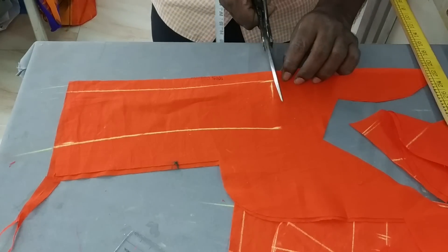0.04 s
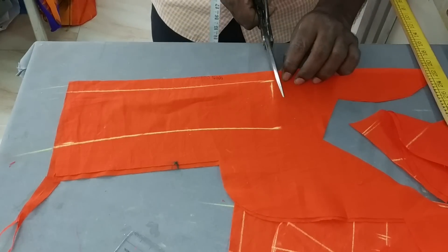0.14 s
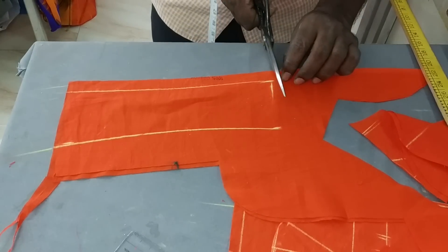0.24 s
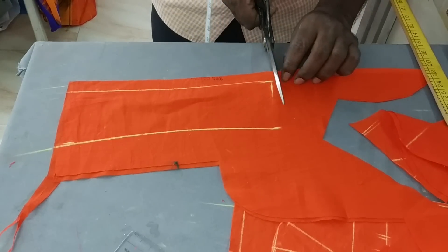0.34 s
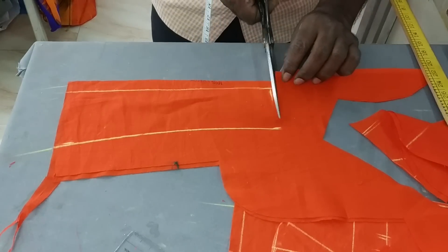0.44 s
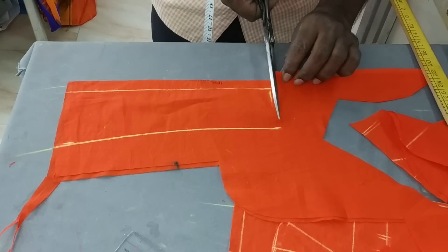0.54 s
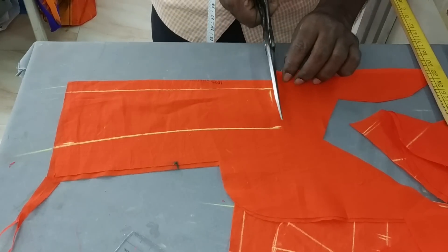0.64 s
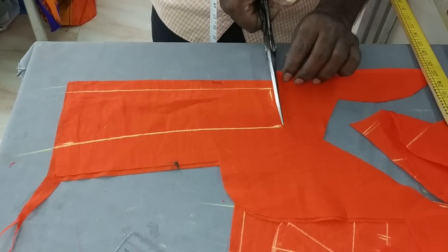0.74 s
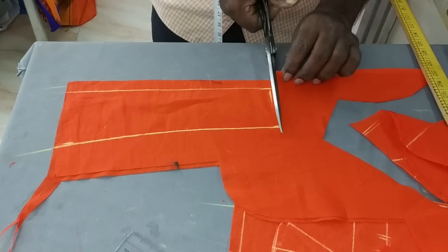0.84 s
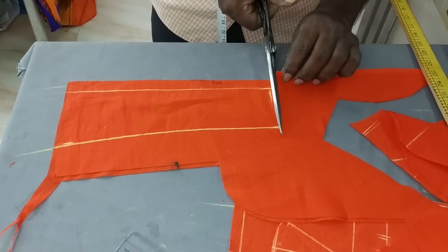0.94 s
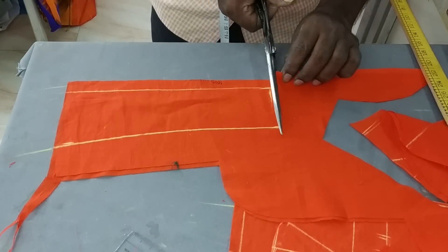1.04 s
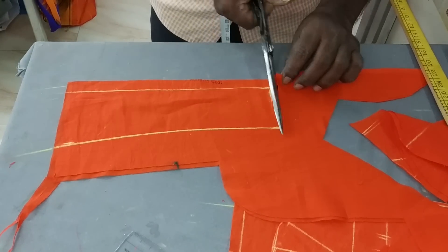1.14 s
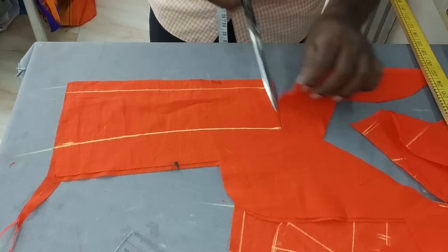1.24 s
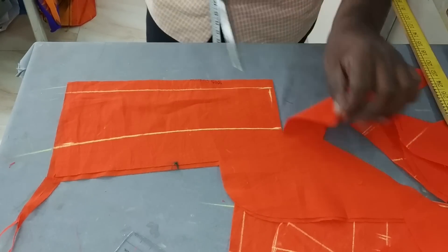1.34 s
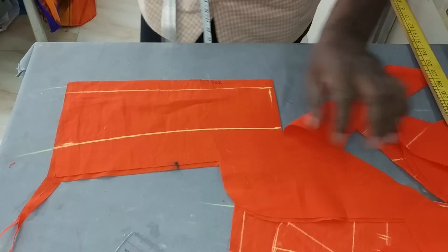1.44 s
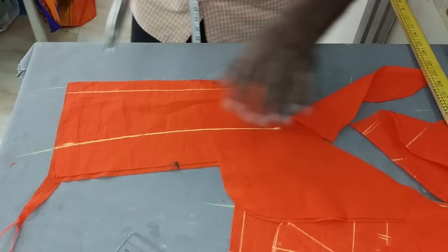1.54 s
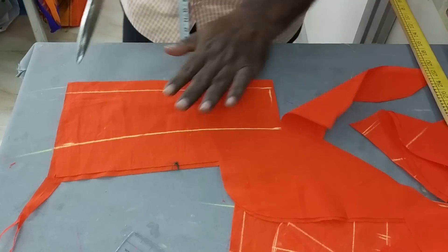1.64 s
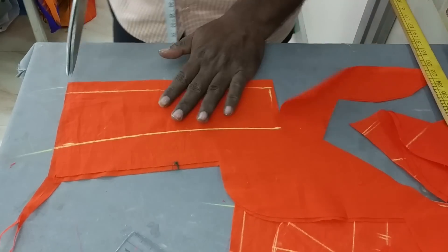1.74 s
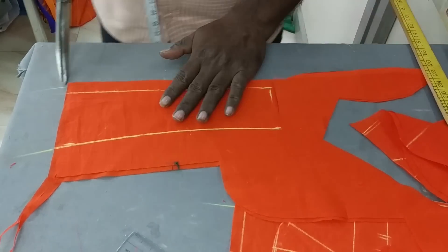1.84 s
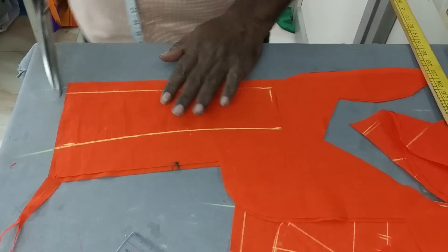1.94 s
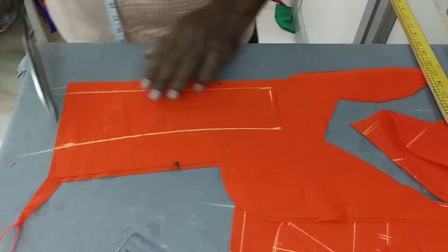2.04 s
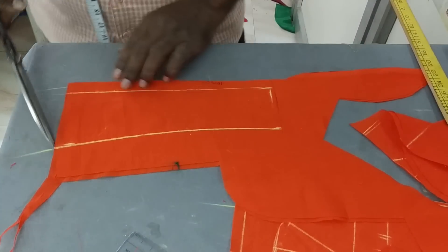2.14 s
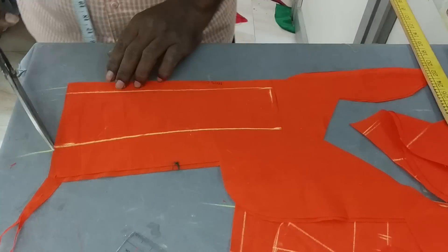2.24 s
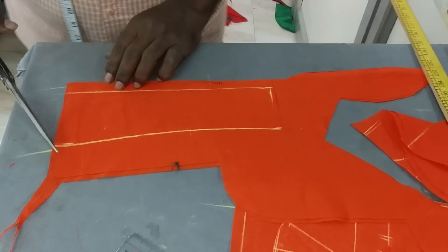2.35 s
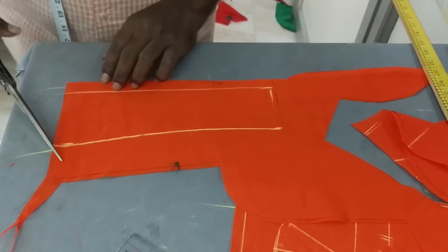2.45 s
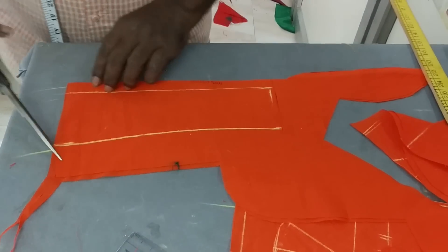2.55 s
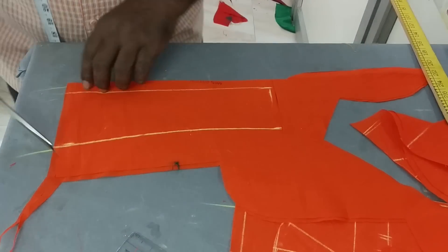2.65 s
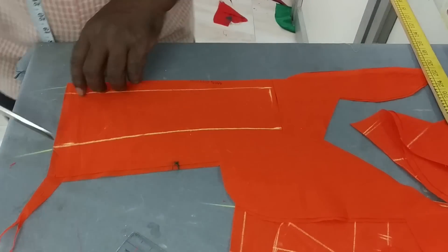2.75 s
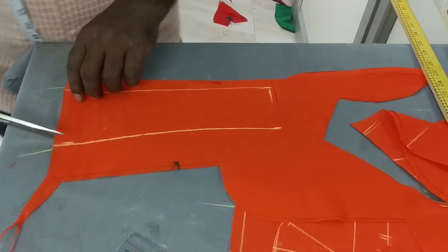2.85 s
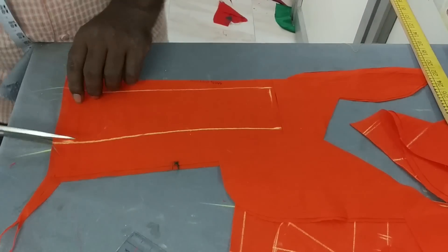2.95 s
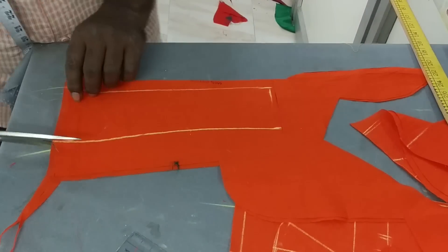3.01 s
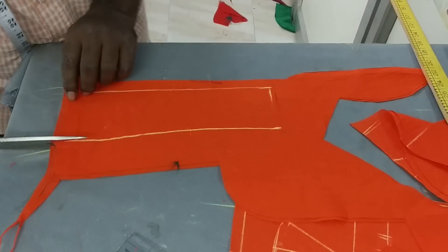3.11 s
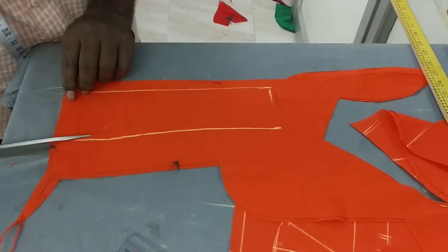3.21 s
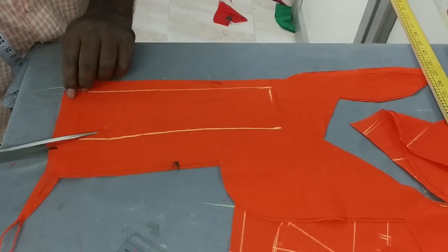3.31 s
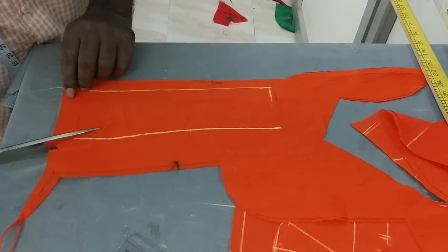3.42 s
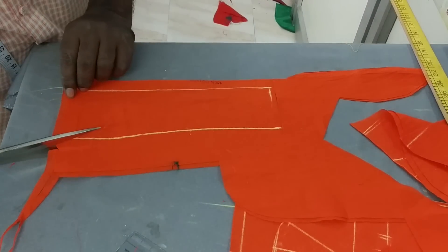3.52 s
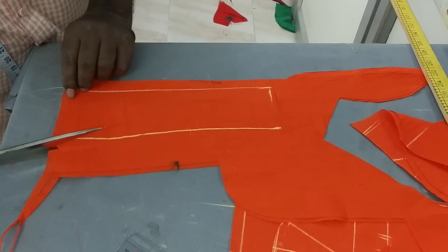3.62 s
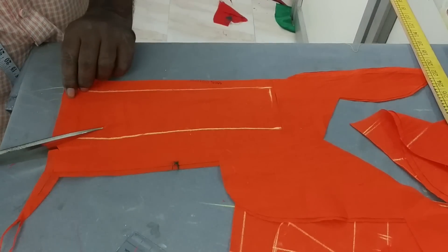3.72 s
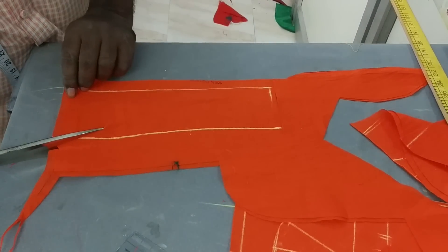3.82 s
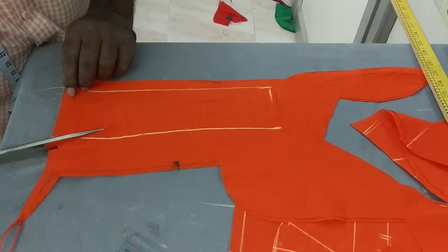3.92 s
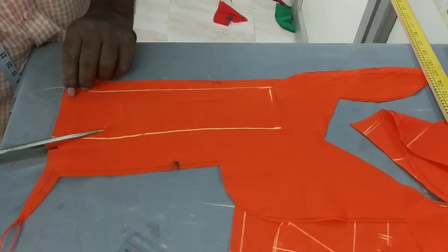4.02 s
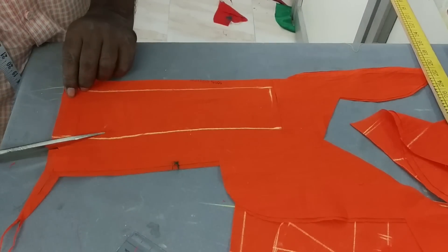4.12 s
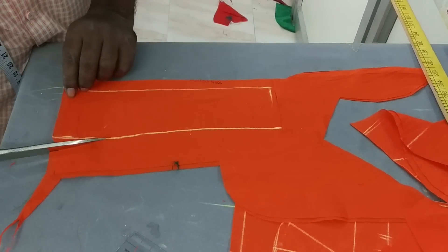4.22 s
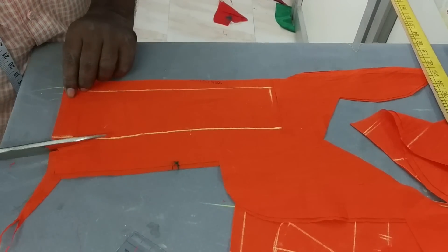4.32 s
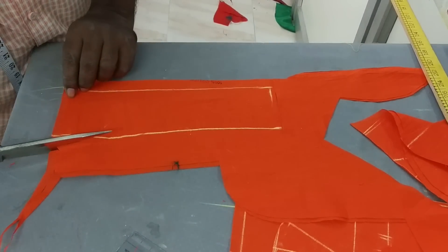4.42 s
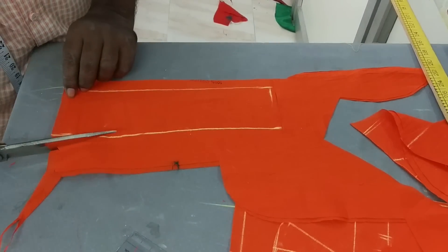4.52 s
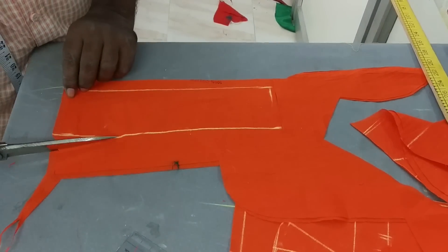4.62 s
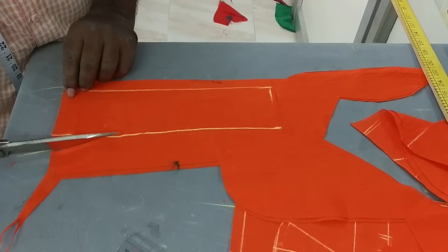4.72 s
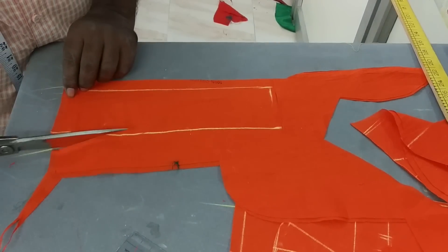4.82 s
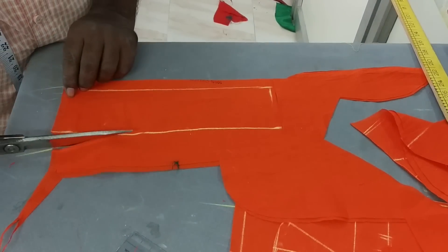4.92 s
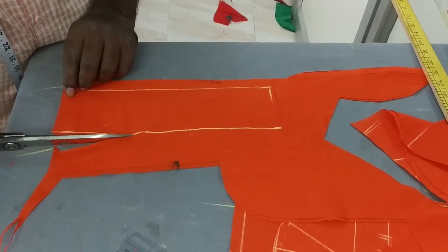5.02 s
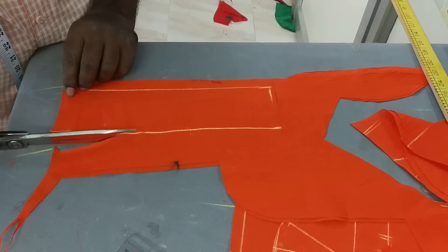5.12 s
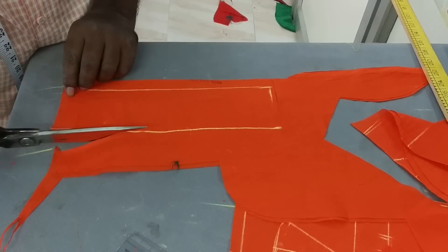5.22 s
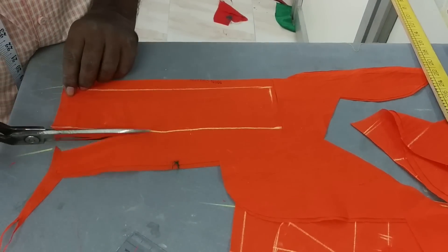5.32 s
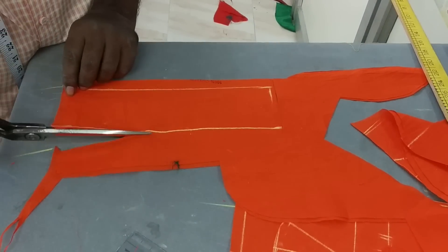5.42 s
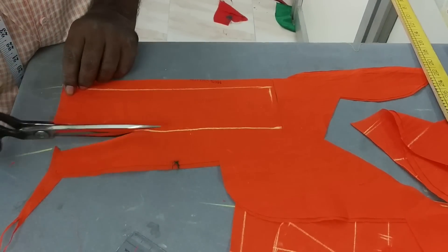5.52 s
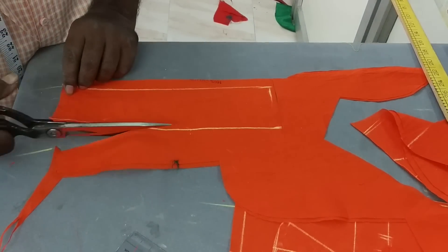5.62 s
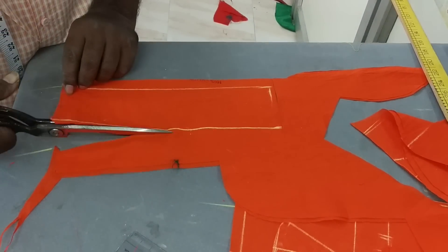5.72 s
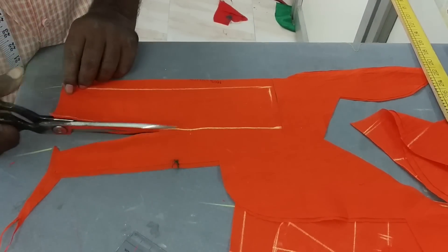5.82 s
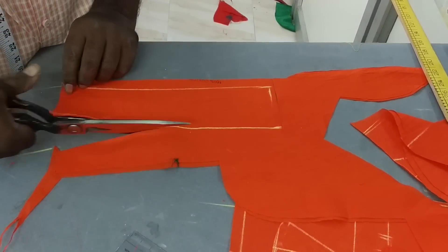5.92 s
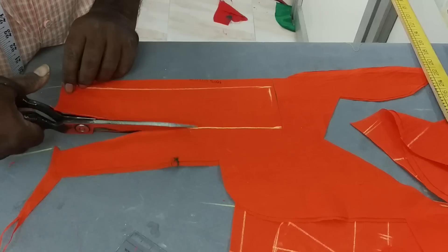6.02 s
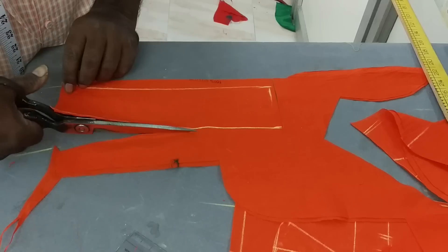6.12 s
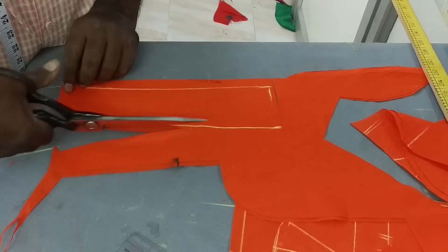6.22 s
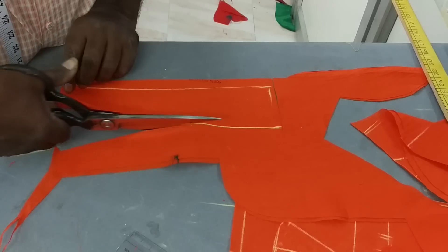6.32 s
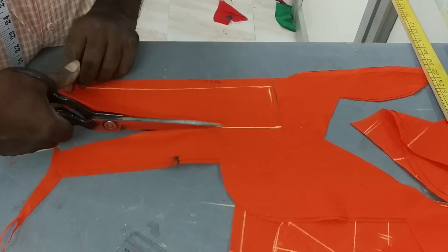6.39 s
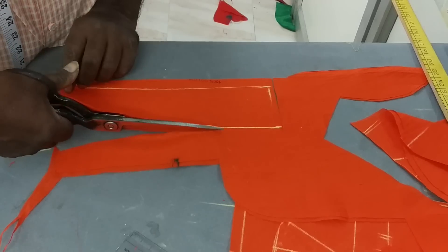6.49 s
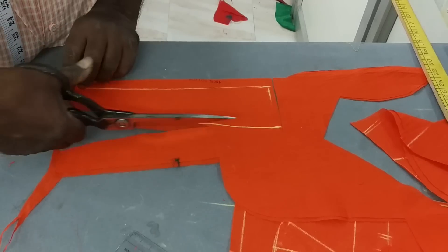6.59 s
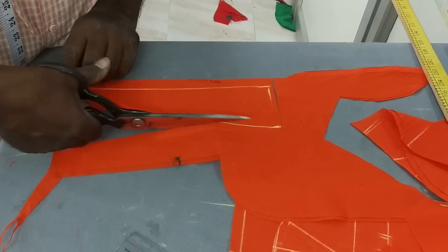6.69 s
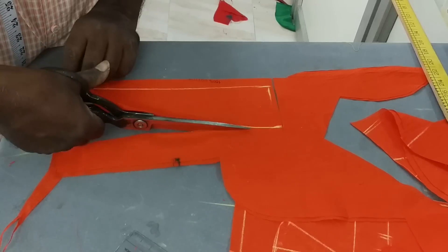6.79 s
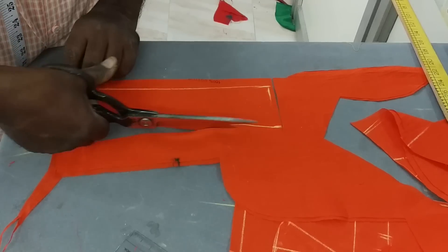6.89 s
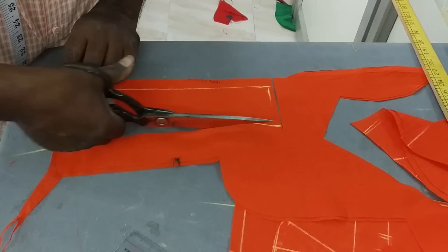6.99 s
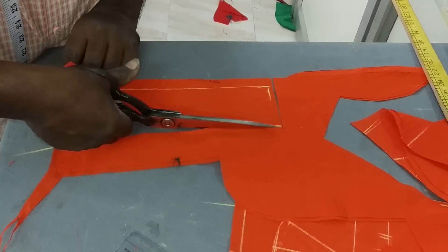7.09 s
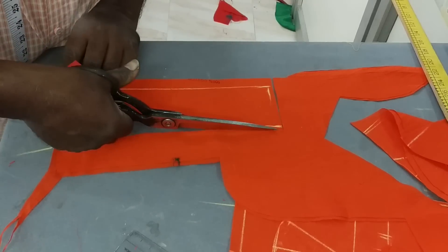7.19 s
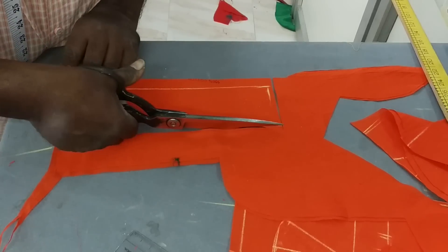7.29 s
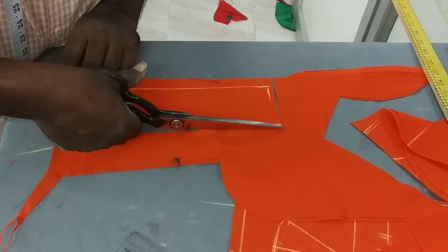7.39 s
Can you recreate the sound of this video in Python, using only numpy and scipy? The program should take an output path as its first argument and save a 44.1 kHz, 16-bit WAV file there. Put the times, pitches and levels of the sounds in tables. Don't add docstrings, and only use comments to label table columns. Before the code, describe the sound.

A close stereo phone microphone picks up large shears cutting cloth on a table in a small room, with faint air noise, low rumble, motor hum and a distant machine whirring at times. Dull knocks come around 0.3 s, then two gritty, crunchy bites at 0.4 and 0.8 s. At 1.1 s the blades snap shut with the loudest, piercing metallic crack, with a faint rebound at 1.25 s. A hand thumps down at 1.7 s, pats softly at 1.85 s and slides with a light swish. A second bright snap cracks at 2.5 s; a small fuzzy scrape groans near 2.9 s. It is nearly quiet until a longer crunching cut at 4.1 s. From 4.6 s to the end, short crisp strokes repeat every 0.35 s or so, thready and steely, jolting the tabletop woodily, with weaker blade-opening scrapes between them.

```python
import sys
import numpy as np
from scipy import signal
from scipy.fft import rfft, irfft
from scipy.io import wavfile
from scipy.ndimage import uniform_filter1d

SR = 44100
rng = np.random.default_rng(int(sys.argv[2]) if len(sys.argv) > 2 else 0)


def gain_from_db(level_db):
    decades = np.asarray(level_db, float) / 20
    return 10 ** decades


def wav_record(signal):
    frames = np.transpose(np.atleast_2d(signal))
    bounded = np.clip(frames, -1, 1)
    quanta = np.round(bounded * 32767).astype(np.int16)
    wavfile.write(sys.argv[1], SR, quanta)


N = 328570
T = np.arange(N) / SR
PORT_S = 16 / SR

# (frequency [Hz], width [Hz], level [dB])
TOP_MODES = [(258.7, 68, -1.5), (346, 66, -4), (454.7, 88, 0.5), (544.2, 90, -0.5), (668, 213, 3.5),
             (856, 100, 6.5), (969, 60, 8.5), (1065, 79, 14), (1132, 76, 6.5), (1829, 170, -3.5),
             (2284, 220, -11)]
# (frequency [Hz], level [dB], decay t60 [s])
WOOD_RING = [(253, 6.5, 0.079), (295, -8.5, 0.15), (346.4, 3.5, 0.1), (401, -1, 0.082), (450, 5.5, 0.08),
             (557, -4, 0.063), (676, -14.5, 0.13), (960, -39.5, 0.081)]
# (frequency [Hz], left-right correlation [0-1])
LIKENESS = [(60, 0.78), (150, 0.98), (300, 0.63), (640, 0.48), (1400, 0.018)]
# (start [s], length [s], place of peak [0-1], table top [dB], blades [dB])
CLOSINGS = [(1.071, 0.012, 0.6, -29.5, -39), (1.089, 0.01, 0.57, -24.5, -35.5),
            (4.592, 0.094, 0.63, -32, -45), (4.963, 0.097, 0.52, -32, -46),
            (5.352, 0.074, 0.72, -33.5, -43), (5.698, 0.096, 0.42, -31, -44),
            (6.062, 0.096, 0.57, -34.5, -44), (6.412, 0.09, 0.9, -32, -44.5),
            (6.757, 0.089, 0.66, -30.5, -43.5), (7.103, 0.098, 0.7, -34, -43.5),
            (7.432, 0.066, 0.65, -27.5, -40.5)]
CAREFUL_STROKES = [
    (0.372, 0.14, 0.51, -36.5, -42.5),
    (0.812, 0.11, 0.48, -36.5, -43),
    (2.468, 0.039, 1, -34, -35.5),
    (4.122, 0.16, 0.8, -39.5, -46),
]


def cutting():
    # (frequency [Hz], width [Hz], level [dB])
    blade_modes = [(3127, 170, -6.5), (3386, 310, -5), (4230, 510, -24), (4695, 310, 1.5), (5330, 370, -4),
                   (6000, 120, -3), (6650, 142, -4.5), (7000, 240, -10), (8050, 130, -8), (8640, 100, -5.5),
                   (8640, 118, -23.5), (9280, 67, 0), (9760, 59, -4), (10660, 300, 3), (11200, 50, -12),
                   (11550, 60, 1), (12200, 200, -3), (13300, 380, 1), (13200, 200, -15), (14000, 270, -21),
                   (15100, 500, 0.5)]
    # (frequency [Hz], level [dB])
    fizz_colour = [(1200, -3.5), (1900, -7), (2600, -8.5), (3300, -3), (4100, -2), (4700, -6), (5400, -9.5),
                   (5900, -9.5), (6500, -13), (7800, -4), (9500, 0.5), (11500, -1), (15000, -7),
                   (16500, -23)]
    # (frequency [Hz], width [Hz], level [dB])
    frame_modes = [(81.5, 16, -2), (118, 18, 3.5), (145, 23, -3.5), (206, 26, -5)]
    # (time [s], tilt [dB per octave])
    place_tilt = [(0, 12), (1.0, -0.5), (2.5, 2.5), (4.2, 0.5), (4.7, -3), (5.4, -5), (5.8, 0), (6.5, 1.5),
                  (7.4, 2.5)]
    # (frequency [Hz], level [dB])
    across = [(3000, -7), (6500, -0.5), (8000, 8), (9500, -0.5), (11000, 2), (12500, -5.5), (14000, 5.5),
              (15500, -1)]
    along = [(3000, 0.5), (5000, -1.5), (7000, 4), (9500, 0), (11000, 1), (12200, 4.5), (13500, 1.5),
             (14800, 5.5)]
    # (time [s], level below the split [dB])
    grip = [(0.45, 3), (0.6, 8), (0.87, 3), (1.08, 2), (2.48, 5), (4.2, 1), (4.64, 4), (5.0, 1), (5.4, 0),
            (5.75, 2), (6.1, -2), (6.45, 1.5), (6.8, 0), (7.15, -1.5), (7.44, 2)]
    # (middle [s], length [s], extra gain [dB])
    crunch = [(0.44, 0.036, -20), (0.495, 0.016, -2), (0.885, 0.041, 2), (1.078, 0.012, -5),
              (4.185, 0.027, -11), (4.62, 0.04, -17), (4.99, 0.044, -14), (5.72, 0.022, -25),
              (6.08, 0.031, -26), (6.44, 0.05, -13), (6.78, 0.046, -17), (7.12, 0.036, -11)]
    turn_s = 3.5
    split_hz, late_db = 6100, 7.5

    parting = threads(per_s=1800, spread_db=3.5)
    cloth = signal.cheby1(4, 1, 1250, fs=SR, output="sos")
    muffled = signal.sosfilt(cloth, parting) + gain_from_db(-4.5) * parting
    damped = [(hz, max(width, hz / 7.1), db) for hz, width, db in TOP_MODES]
    tilt_db = np.interp(T[::16], *np.transpose(place_tilt))
    top = body(muffled, damped, wander_db=2.5, scatter=3.13, per_s=21, tilt_db=tilt_db, order=2, slide=.05)
    frame = body(parting, frame_modes, wander_db=1.3, scatter=1.2)

    fine_parting = threads(per_s=9000, spread_db=2.5)
    steel = body(fine_parting, blade_modes, wander_db=4.2, scatter=1.6, per_s=28, order=2, slide=.008)
    fizz = wash(fizz_colour, 4.0, uniform_filter1d(abs(parting), 40) + .3)
    blades = gapped(steel + gain_from_db(2.5) * fizz)
    blades = np.where(T < turn_s, coloured(blades, across), coloured(blades, along))

    lowpass = signal.butter(4, split_hz, fs=SR, output="sos")
    lower = signal.sosfilt(lowpass, blades[:, ::-1])[:, ::-1]
    lower = signal.sosfilt(lowpass, lower)
    lower_db = np.interp(T, *np.transpose(grip)) + late_db * progress()
    blades = blades + (gain_from_db(lower_db) - 1) * lower

    top = gain_from_db(-3.0) * strokes(column=3, share=0.9) * steadied(top, 0.054)
    frame = gain_from_db(2.5) * strokes(column=4, share=0.27) * steadied(frame, 0.092)
    blades = strokes(column=4, share=0.31) * (1 + swells(crunch, column=2)) * steadied(blades, 0.0275)
    return top + frame + blades


def threads(per_s, spread_db):
    size = gain_from_db(spread_db * np.minimum(rng.exponential(1, N), 4))
    return evened(size * (rng.random(N) < per_s / SR) * rng.choice([-1, 1], N))


def strokes(column, share):
    opening_strokes = [(0.58, 0.047, 0.9, -45.5, -52), (1.001, 0.027, .3, -44, -55.5),
                       (2.615, 0.042, 0.6, -47.5, -47), (4.355, 0.053, 0.75, -53, -61.5),
                       (4.75, 0.055, 0.32, -48.5, -57), (5.122, 0.066, 0.22, -50.5, -61.5),
                       (5.49, 0.053, 0.44, -45.5, -55.5), (5.849, 0.046, 0.71, -45, -52.5),
                       (6.205, 0.047, 0.6, -46, -51), (6.56, 0.056, 0.48, -46.5, -50),
                       (6.89, 0.0655, 0.81, -45.5, -51), (7.268, 0.049, 0.94, -54, -63)]
    let_go_s = 0.0088
    # (rows, bite [s], effort at start and end below the peak [dB], extra share of the effort)
    kinds = ((CLOSINGS, 0.0042, -9.5, -10.5, 0),
             (opening_strokes, 0.0042, -2.5, -3.5, 0),
             (CAREFUL_STROKES, 0.01, -9, -8, 0.28))
    gain = np.zeros((1, N))
    for rows, bite_s, start_db, end_db, more in kinds:
        for row in rows:
            start, length, place = row[:3]
            t = T[:round((length + 4 * let_go_s) * SR)]
            peak_at = np.clip(place, .05, .95)
            effort_db = np.interp(t / length, [0, peak_at, 1], [start_db, 0, end_db])
            gate = np.minimum(t / bite_s, 1) * np.exp(-(np.maximum(t - length, 0) / let_go_s) ** 2)
            level_db = row[column] + min(share + more, 1) * effort_db
            add(gain, start, (gain_from_db(level_db) * gate)[None])
    return gain


def progress():
    ends = []
    for start, length, *rest in sorted(CLOSINGS + CAREFUL_STROKES):
        ends += [(start, -.5), (start + length, .5)]
    return np.interp(T, *np.transpose(ends))


def jolts():
    # (time [s], peak [dB], frequency [Hz])
    top_jolts = [(4.107, -43, 533), (4.141, -31, 1100), (4.168, -30, 1110), (4.19, -36, 523),
                 (4.214, -29, 485), (4.238, -26.5, 518), (4.272, -35, 460), (4.375, -36.5, 530),
                 (4.591, -40, 536), (4.617, -28.5, 530), (4.646, -28, 557), (4.751, -49, 390),
                 (4.762, -39.5, 579), (4.797, -37, 518), (4.956, -49, 350), (4.967, -37, 470),
                 (4.991, -30.5, 557), (5.124, -45, 462), (5.148, -41, 557), (5.354, -34, 940),
                 (5.379, -26, 510), (5.396, -27.5, 445), (5.503, -48, 467), (5.7, -30.5, 930),
                 (5.718, -25, 923), (5.732, -37, 473), (5.778, -35, 507), (5.852, -46, 900),
                 (5.875, -41, 950), (5.889, -34.5, 857), (6.065, -33.5, 920), (6.102, -28.5, 950),
                 (6.208, -46, 439), (6.246, -39.5, 464), (6.401, -42, 437), (6.419, -30, 716),
                 (6.444, -23, 956), (6.465, -23.5, 950), (6.487, -24, 703), (6.535, -41, 720),
                 (6.558, -43, 410), (6.597, -36, 886), (6.764, -47, 654), (6.78, -32.5, 676),
                 (6.805, -25, 840), (6.832, -28.5, 916), (6.903, -47, 440), (6.943, -39, 910),
                 (7.105, -33.5, 750), (7.117, -32, 880), (7.15, -22, 1000), (7.174, -30, 617),
                 (7.274, -47, 614), (7.435, -29.5, 610),
                 (0.386, -51, 900), (0.408, -36, 993), (0.422, -33, 880), (0.582, -41, 800),
                   (0.619, -41.5, 442), (0.64, -42.5, 581), (0.739, -42.5, 346), (0.778, -48, 353),
                   (0.8, -48, 452), (0.828, -27, 1009), (0.855, -42.5, 426.5), (0.885, -33, 985)]
    frame_jolts = [(0.383, -34, 113), (0.429, -31, 94), (0.459, -34, 128), (0.484, -32, 132.3),
                   (0.579, -36, 109), (0.823, -42, 91.5), (0.849, -41, 104.8), (0.901, -35, 119),
                   (1.074, -22.5, 95), (1.094, -24, 114.2), (4.199, -34.5, 164), (4.619, -35, 237),
                   (5.369, -42.5, 227), (5.722, -32.5, 93.3), (6.105, -37.5, 124), (6.423, -36, 102),
                   (6.781, -34, 91.3), (7.121, -37, 186)]
    out, t = np.zeros((2, N)), T[:1500]
    for s, peak_db, hz in top_jolts + frame_jolts:
        u = t * hz / 2.58
        lag = np.array([[0], [2 * np.pi * PORT_S * hz * min(hz / 1000, 1) ** 5.1]])
        add(out, s, gain_from_db(peak_db - 6.5) * u * np.exp(1 - u) * np.sin(2 * np.pi * hz * t - lag))
    return out


def singing():
    # (middle [s], length [s], level [dB rms], frequency [Hz])
    whistles = [(0.453, 0.049, -51, 14990), (0.467, 0.06, -53, 13180), (0.477, 0.047, -54, 4650),
                (0.494, 0.028, -41, 10630), (0.499, 0.028, -45.5, 7770), (0.856, 0.074, -59, 8530),
                (0.87, 0.039, -53, 5340), (0.877, 0.066, -54, 4640), (0.882, 0.02, -43, 11200),
                (0.882, 0.023, -43, 7800), (0.902, 0.045, -42, 12000), (1.254, 0.026, -65, 4760),
                (1.869, 0.029, -63, 4820), (4.212, 0.036, -50, 12400), (4.624, 0.055, -50, 13700),
                (4.641, 0.06, -58, 15160), (4.994, 0.052, -54, 15160), (5.005, 0.06, -54, 15160),
                (5.029, 0.064, -57, 4640), (5.03, 0.038, -52, 11710), (5.032, 0.07, -53, 4640),
                (5.374, 0.041, -51, 15070), (5.397, 0.06, -56, 11710), (5.72, 0.039, -51, 15160),
                (5.767, 0.046, -57, 5430), (6.116, 0.06, -52, 11800), (6.224, 0.028, -56, 10510),
                (6.229, 0.033, -58, 13700), (6.453, 0.036, -49, 14990), (6.471, 0.052, -53, 11800),
                (6.488, 0.036, -53, 10770), (6.794, 0.053, -55, 8530), (6.814, 0.044, -52, 11710),
                (6.818, 0.055, -55, 15250), (6.834, 0.032, -58, 5510), (7.112, 0.014, -49, 10420),
                (7.129, 0.048, -53, 15070), (7.153, 0.058, -57, 11540), (7.18, 0.048, -55, 5510),
                (7.198, 0.03, -49, 11200), (7.438, 0.02, -49, 11630), (7.441, 0.019, -58, 5510)]
    out, luck = np.zeros((2, N)), rng.standard_normal((len(whistles), 2, 4000))
    t = T[:4000] - 2000 / SR
    for (middle, length, db, hz), (a, b) in zip(whistles, luck):
        width_hz = min(160, hz / 42)
        pole = np.exp(-np.pi * width_hz / SR)
        fuzz = signal.lfilter([1], np.poly([pole, pole]), a + 1j * b)
        fuzz = fuzz / (abs(fuzz) + .4 * np.sqrt(np.mean(abs(fuzz) ** 2)))
        port_phase = np.array([[0], [0.95 * a[0]]])
        whistle = fuzz * np.exp(2j * np.pi * hz * t + 1j * port_phase)
        swell = np.exp(-(2 * t / length) ** 4 / 2)
        add(out, middle - 2000 / SR, gain_from_db(db - 2) * swell * evened(whistle.real))
    return out


def snaps():
    # (time [s], peak [dB], ring [dB rel.], table [dB rel.], thump [Hz])
    meetings = [
        (0.5837, -43, -16, -17, 128),
        (1.099, 0, -31, -26, 117),
        (1.252, -30, -30, -33, 155.7),
        (2.5091, -5, -21, -21.5, 180),
        (2.673, -40.5, -16, -7.5, 152),
        (3.901, -37, -43.5, -32, 125),
                (1.858, -42.5, -8, -17, 150),
        (1.873, -59, -16, -21, 150),
    ]
    # (time [s], peak [dB])
    rebounds = [
        (1.1014, -6),
        (1.252, -29),
        (2.5107, -4.5),
        (2.51, -9.5),
    ]
    # (frequency [Hz], level [dB], decay t60 [s])
    free_ring = [(4840, -2, 0.16), (6700, -12, 0.25), (7500, -17, 0.21), (8340, -2.5, 0.35),
                 (10100, -9, 0.161), (8800, -13, 0.44), (10260, -15, 0.7), (10700, -5, 0.19),
                 (10700, -2.5, 0.31), (10900, -5.5, 0.35), (11100, -13, 5.0), (13500, -3.5, 0.18),
                 (13100, -15, 0.25), (12400, -13, 0.18)]
    # (frequency [Hz], level [dB])
    rattle_colour = [(710, -50), (1200, 0), (1790, -7), (3700, -21.5), (4400, 2.5), (5150, 5), (5710, -38),
                     (8000, 5.5), (8910, 1), (11100, -14.5), (12300, -18), (13300, -20), (14400, -22.5),
                     (15500, -30), (16000, -56)]
    out, t = np.zeros((2, N)), T[:14000]
    for s, peak_db, ring_db, table_db, hz in meetings:
        crack = burst(steel_colour(s), t, 0.013)
        after = ringing(free_ring, t) + gain_from_db(3.5) * gapped(burst(rattle_colour, t, .19))
        low = gain_from_db(table_db + 8.5) * thump(hz, 0.11, t)
        low = low + gain_from_db(table_db + 5.0) * ringing(WOOD_RING, t) * np.minimum(t / 0.0015, 1)
        add(out, s, gain_from_db(peak_db) * (crack + gain_from_db(ring_db) * after + low))
    for s, peak_db in rebounds:
        add(out, s, gain_from_db(peak_db) * burst(steel_colour(s), t, 0.017))
    return out


def steel_colour(s):
    # (frequency [Hz], level [dB])
    steel_levels = [(530, -51), (900, -12.5), (2570, -12.5), (3000, -8), (3470, -19.5), (4980, 1.5),
                    (5960, -19), (7580, -3.5), (8980, -7), (9650, 0.5), (12400, -1.5), (13400, 0.5),
                    (16000, -24.5)]
    # (frequency [Hz], level [dB])
    tip_levels = [(700, 19), (1000, -4.5), (1600, -5), (2300, -1), (3000, 2.5), (3600, 2), (7500, 3.5),
                  (10200, -6.5), (13300, 4.5), (15500, -3)]
    hz = np.geomspace(300, 20000, 80)
    at_tips = s > 2.0
    return np.transpose([hz, read(steel_levels, hz) + at_tips * read(tip_levels, hz)])


def gapped(x):
    # (frequency [Hz], width [Hz], level [dB])
    silent_gaps = [(2620, 124, -19), (3964, 197, -11.5), (5120, 81, -7), (6340, 210, -14), (7350, 160, -16),
                   (9030, 110, -7), (12800, 150, -5.5)]
    hz = np.fft.rfftfreq(x.shape[1], 1 / SR)
    gap_db = sum(db * np.exp(-((hz - f) / width) ** 2) for f, width, db in silent_gaps)
    return irfft(rfft(x) * gain_from_db(gap_db), x.shape[1])


def knocks():
    # (time [s], peak [dB], thump [dB rel.], thump [Hz], wood [dB rel.])
    knuckles = [(0.264, -31.5, -14, 103, -5.5), (0.301, -41.5, -16, 115, 1),
                (0.353, -34.5, -15, 77.6, -3.5), (0.738, -34, -12, 134, -6.5),
                (0.827, -30.5, -15.5, 109, -2), (1.7131, -36, -6, 95, -1), (1.7243, -29.5, 8.5, 89, 1.5)]
    palms = [(1.832, -34, 1, 161, 11), (1.844, -45, 3, 169, 8), (1.865, -39, 1, 61.5, 7.9)]
    knuckle_hz, palm_hz = 1900, 520
    blows = [(*k, knuckle_hz) for k in knuckles] + [(*p, palm_hz) for p in palms]
    out, t = np.zeros((2, N)), T[:8000]
    for s, peak_db, thump_db, hz, wood_db, bright_hz in blows:
        colour = [(150, -10), (400, 0), (bright_hz, -10), (2.5 * bright_hz, -22),
                  (5 * bright_hz, -50), (20000, -60)]
        tap = burst(colour, t, 0.05)
        wood = gain_from_db(wood_db) * ringing(WOOD_RING, t) * np.minimum(t / 0.0049, 1)
        sway = gain_from_db(thump_db + 11.5) * thump(hz, .1, t)
        add(out, s, gain_from_db(peak_db - 4.5) * (tap + wood + sway))
    return out


def rustle():
    # (middle [s], length [s], swish [dB], drag on the table [dB])
    hand_drags = [(1.88, 0.02, -71, -65), (1.99, 0.26, -65.5, -51), (2.19, 0.14, -62, -54),
                  (2.325, 0.08, -57.5, -80), (2.43, 0.26, -66.5, -72), (2.78, 0.24, -66.5, -56),
                  (2.92, 0.2, -65.5, -50), (3.16, 0.19, -63, -76)]
    # (frequency [Hz], level [dB])
    swish_colour = [(1200, -5.5), (2500, -6), (5000, -6.5), (9000, -2.5), (13000, -2.5), (16000, -8.5)]
    swish = wash(swish_colour, 2.4, gain_from_db(0.71 * np.repeat(drift(67), 16)[:N]))
    drag = body(threads(per_s=1200, spread_db=4.5), TOP_MODES[:5], wander_db=4.0, scatter=0.71)
    swish = gain_from_db(7.0) * swells(hand_drags, column=2) * swish
    return swish + gain_from_db(-7.5) * swells(hand_drags, column=3) * drag


def scrape():
    # (time [s], level [dB], pitch [Hz])
    groan = [
        (2.83, -53, 340),
        (2.88, -56, 374),
        (2.93, -48, 450),
        (2.98, -64, 412),
    ]
    s, db, hz = np.transpose(groan)
    wobble = 1 + 0.091 * np.repeat(drift(50), 16)[:N]
    return curve(groan) * np.sin(2 * np.pi * np.cumsum(np.interp(T, s, hz) * wobble) / SR)


def workroom():
    # (frequency [Hz], level [dB])
    air_colour = [(35, -36), (60, 0), (202, -12.5), (274, -24), (338, -20.5), (682, -25), (924, -29),
                  (1340, -32), (1910, -33), (4030, -36), (16000, -37)]
    # (time [s], level [dB])
    rumble_levels = [(0.0, -49.5), (0.27, -46), (1.68, -50.5), (1.72, -40), (1.82, -45.5), (1.93, -39.5),
                     (2.82, -44.5), (3.05, -51), (3.5, -53), (3.53, -52), (5.15, -44), (5.21, -45),
                     (5.25, -42.5), (6.43, -51), (7.37, -47.5), (7.45, -43)]
    # (frequency [Hz], level [dB rms])
    motors = [(75.4, -56.5), (113.0, -62), (199.2, -59.5), (672.9, -74)]
    # (frequency [Hz], width [Hz], level [dB])
    machine_modes = [(587, 40, -3), (1390, 110, -3), (1857, 90, -8), (2250, 120, -9), (2640, 80, -5)]
    # (middle [s], length [s], level [dB])
    machine_runs = [
        (0.12, 1, -62),
        (2.0, 0.085, -59),
        (4.5, 0.97, -65),
    ]
    steady_db = 1.2
    air = gain_from_db(-52) * wash(air_colour, 2.5)
    rumble_modes = [(26.4, 5.3, -2.5), (38.26, 3.2, 5.0), (62.0, 15, -6.5)]
    rumble = curve(rumble_levels) * body(rng.standard_normal(N), rumble_modes, steady_db, 0.34, 1.73)
    noise = rng.standard_normal(N)
    hum = gain_from_db(-56.0) * body(noise, [(hz, 6, db) for hz, db in motors], steady_db, 0.24, 0.87)
    whine = swells(machine_runs, column=2) * body(noise, machine_modes, steady_db, 3.7, 5.8)
    return air + rumble + hum + whine


def room(x):
    # (frequency [Hz], t60 [s])
    room_decay = [(80, 0.7), (400, 0.34), (2000, 0.27), (6000, 0.25), (12000, 0.2)]
    taps = np.zeros((2, SR // 2))
    at = np.arange(300, SR // 2 - 20, 20)
    at = at + rng.integers(0, 20, (2, len(at)))
    np.put_along_axis(taps, at, rng.choice([-1., 1.], at.shape), 1)
    hz, t, z = signal.stft(taps, SR, nperseg=256)
    z = paired(z, read(LIKENESS, hz)[:, None])
    tail = signal.istft(z * gain_from_db(-60 * t / read(room_decay, hz)[:, None]), SR, nperseg=256)[1]
    return signal.fftconvolve(x, tail / np.linalg.norm(tail[0]), axes=1)[:, :N]


def body(drive, modes, wander_db, scatter, per_s=14, tilt_db=0, order=1, slide=0):
    out = np.zeros((2, N))
    for hz, width, db in modes:
        pole = np.exp((-np.pi * width + 2j * np.pi * hz) / SR)
        strength = width ** (order - .5) / 100 ** (order - 1)
        ring = signal.lfilter([strength], np.poly([pole] * order), drive)
        if slide:
            shift_hz = np.repeat(slide * hz * drift(per_s / 2), 16)[:N]
            ring = ring * np.exp(2j * np.pi * np.cumsum(shift_hz) / SR)
        gain = gain_from_db(db + wander_db * drift(per_s) + tilt_db * np.log2(hz / 600))
        lag = 2 * np.pi * PORT_S * hz * min(hz / 1000, 1) ** 5.8
        lag = lag + scatter * hz / (hz + 1500) * drift(per_s / 2)
        out[0] += ring.imag * np.repeat(gain, 16)[:N]
        out[1] += (ring * np.repeat(gain * np.exp(-1j * lag), 16)[:N]).imag
    return evened(out)


def ringing(modes, t):
    out = np.zeros((2, len(t)))
    for hz, db, t60 in modes:
        phase = rng.uniform(0, 2 * np.pi) + np.array([[0], [hz / 1800 * rng.standard_normal()]])
        beat = np.cos(2 * np.pi * 0.011 * hz * rng.random() * t)
        decay = gain_from_db(db - 60 * t / np.clip(t60, .01, .3))
        out += decay * beat * np.sin(2 * np.pi * hz * t + phase)
    return out / np.sqrt(sum(gain_from_db(2 * db) for hz, db, t60 in modes))


def burst(colour, t, t60):
    hz = np.fft.rfftfreq(len(t), 1 / SR)
    spectra = paired(rfft(rng.standard_normal((2, len(t)))), read(LIKENESS, hz / 2.0))
    noise = irfft(spectra * gain_from_db(read(colour, hz)), len(t))
    crack = noise * gain_from_db(-60 * t / t60) * np.minimum(t / 0.0004, 1)
    return crack / abs(crack).max()


def thump(hz, t60, t):
    return gain_from_db(-60 * t / t60) * np.sin(2 * np.pi * hz * t) * np.minimum(t / 0.004, 1)


def wash(colour, patchy_db, grains=None):
    noise = rng.standard_normal((2, N)) * (1 if grains is None else grains)
    z = signal.stft(noise, nperseg=1024)[2]
    hz = np.fft.rfftfreq(1024, 1 / SR)
    patches = rng.standard_normal(z[0].shape[::-1]).T
    patches = evened(uniform_filter1d(uniform_filter1d(patches, 6, 0), 9, 1))
    z = paired(z, read(LIKENESS, hz)[:, None])
    z = z * gain_from_db(read(colour, hz)[:, None] + patchy_db * patches)
    return evened(signal.istft(z, nperseg=1024)[1][:, :N])


def paired(z, likeness):
    same = np.clip(likeness, 0, 1)
    return np.array([z[0], same * z[0] + np.sqrt(1 - same ** 2) * z[1]])


def coloured(x, colour):
    return irfft(rfft(x) * gain_from_db(read(colour, np.fft.rfftfreq(N, 1 / SR))), N)


def read(points, hz):
    f, value = np.transpose(points)
    return np.interp(np.log(hz + 1), np.log(f + 1), value)


def evened(x):
    return x / np.sqrt(np.mean(x ** 2) + 1e-20)


def steadied(x, seconds):
    return x / np.sqrt(uniform_filter1d((x ** 2).mean(0), round(seconds * SR)) + 1e-9)


def swells(rows, column):
    power = 0
    for row in rows:
        middle, length = row[:2]
        power = power + gain_from_db(2 * row[column]) * np.exp(-(2 * (T - middle) / length) ** 2 * 2)
    return np.sqrt(power)


def curve(rows):
    s, db = np.transpose(rows)[:2]
    return uniform_filter1d(gain_from_db(np.interp(T, s, db)) * (T >= s[0]) * (T < s[-1]), 90)


def drift(per_s):
    return np.interp(T[::16] * per_s, np.arange(400), rng.standard_normal(400)) * 1.22


def add(mix, s, sound):
    part = mix[:, round(s * SR):][:, :sound.shape[1]]
    part += sound[:, :part.shape[1]]


def scene():
    table = cutting() + jolts() + snaps() + knocks() + rustle() + scrape()
    return table + gain_from_db(-11.5) * room(table) + workroom() + singing()


def roll_off(x):
    return signal.sosfilt(signal.butter(12, 16710, fs=SR, output="sos"), x)


def record(dry):
    ports = dry * gain_from_db(np.array([[.45], [-.45]]))
    band_limit = signal.firwin(801, 15900, window=("kaiser", 9), fs=SR)
    limited = signal.oaconvolve(ports, band_limit[None], "same")
    return roll_off(np.clip(limited, -1, 1))


dry = scene()
out = record(dry)
wav_record(out)
```